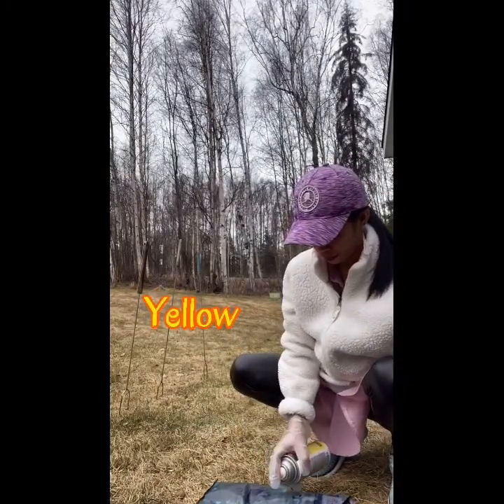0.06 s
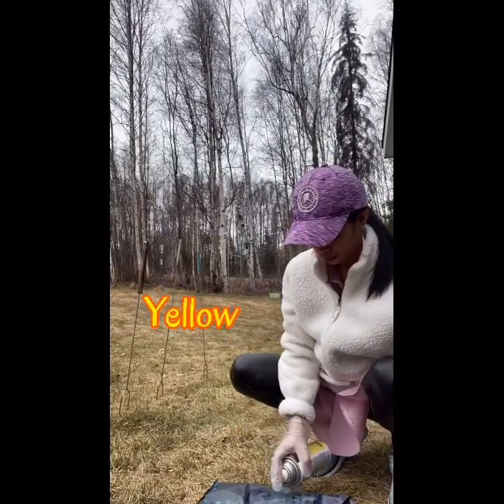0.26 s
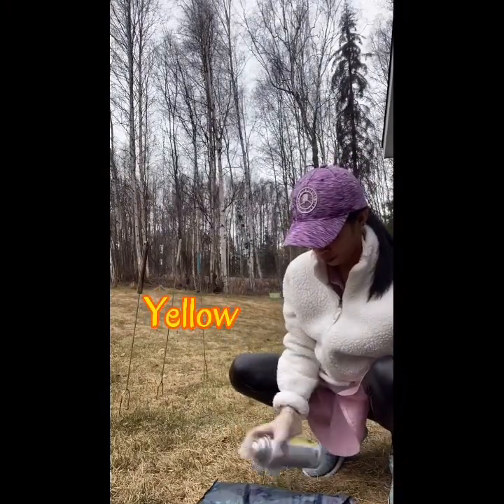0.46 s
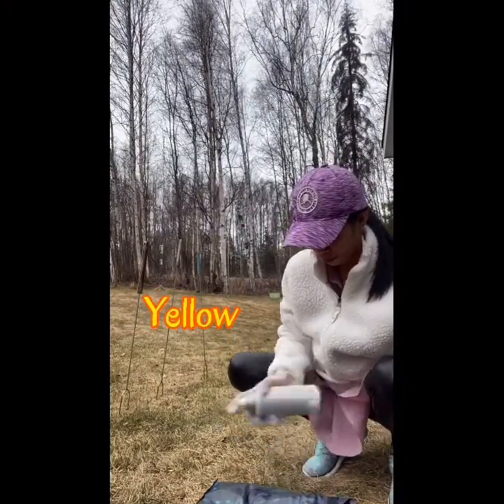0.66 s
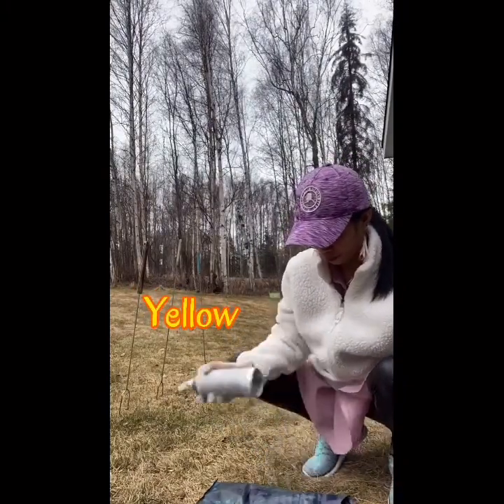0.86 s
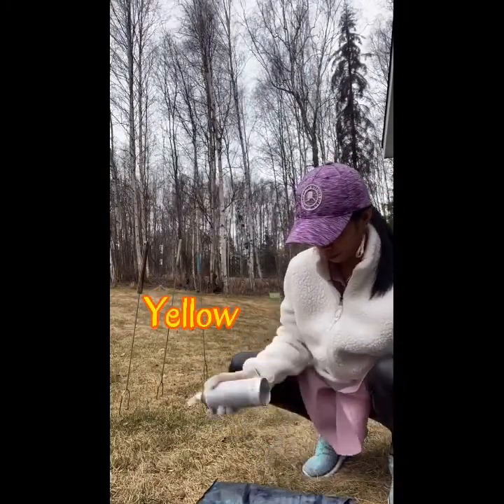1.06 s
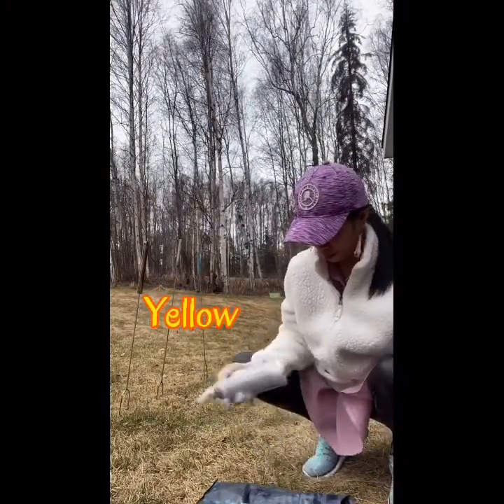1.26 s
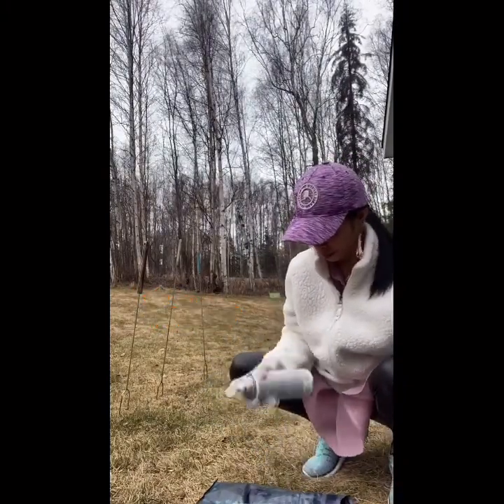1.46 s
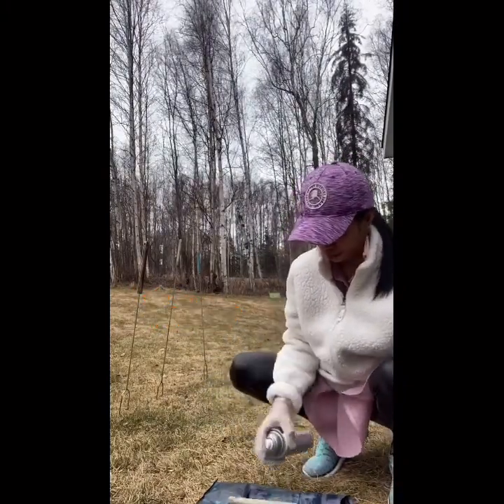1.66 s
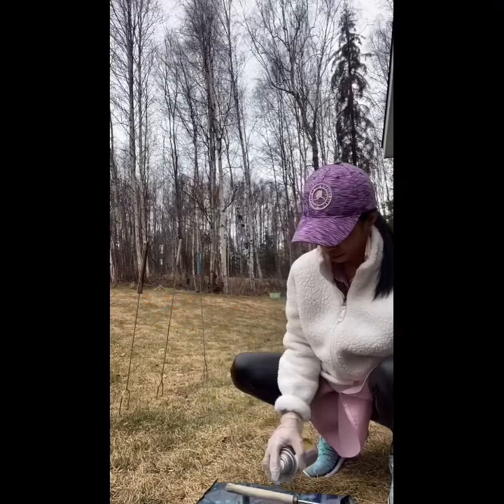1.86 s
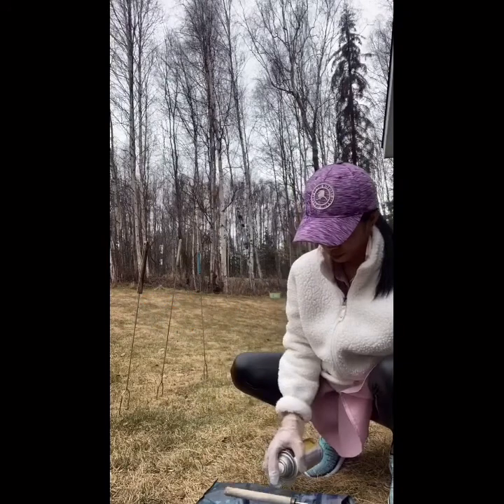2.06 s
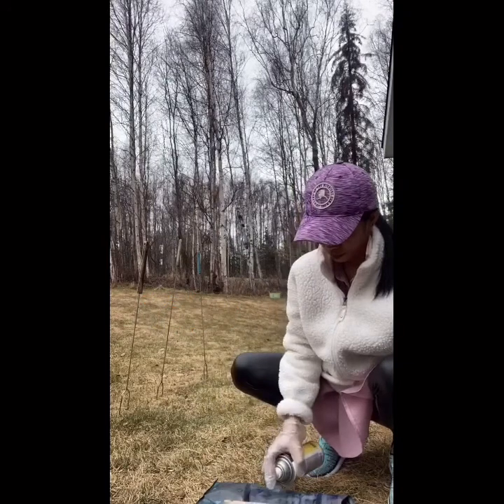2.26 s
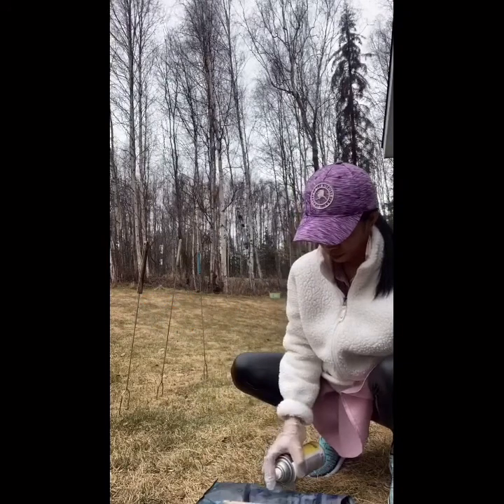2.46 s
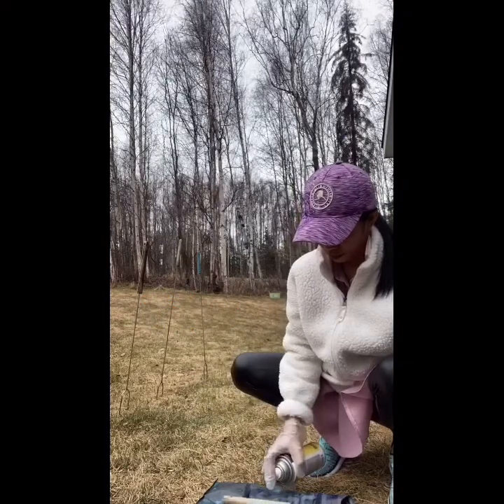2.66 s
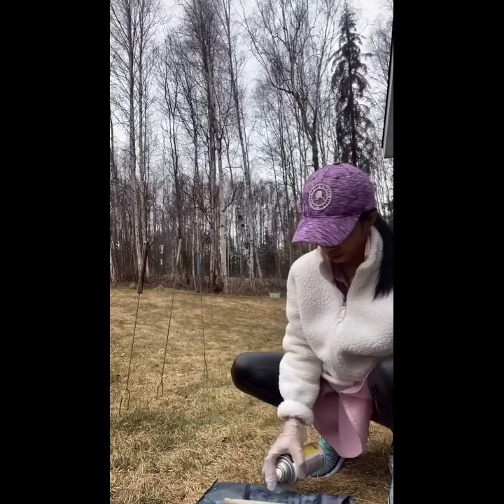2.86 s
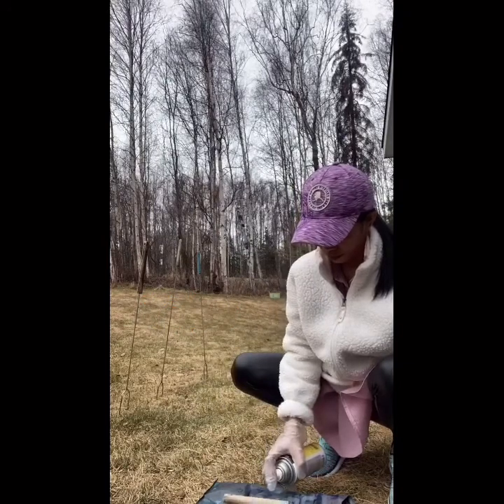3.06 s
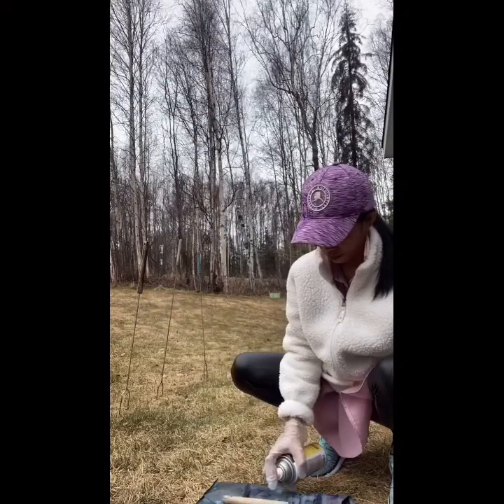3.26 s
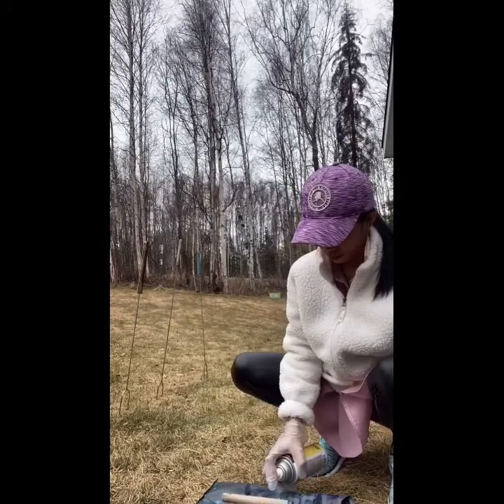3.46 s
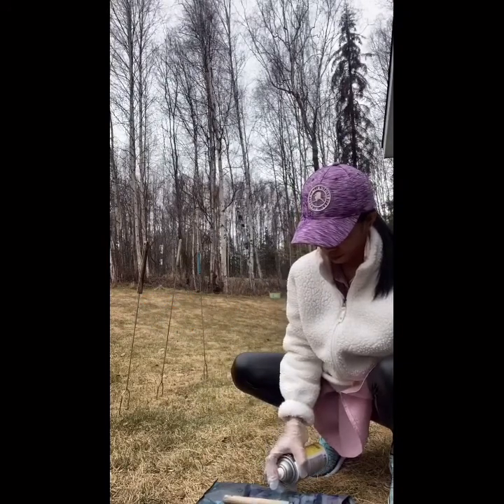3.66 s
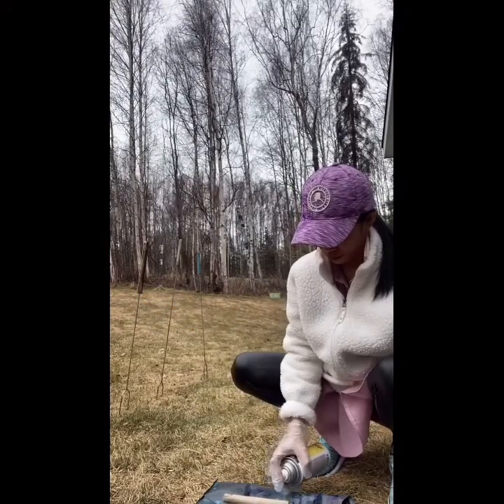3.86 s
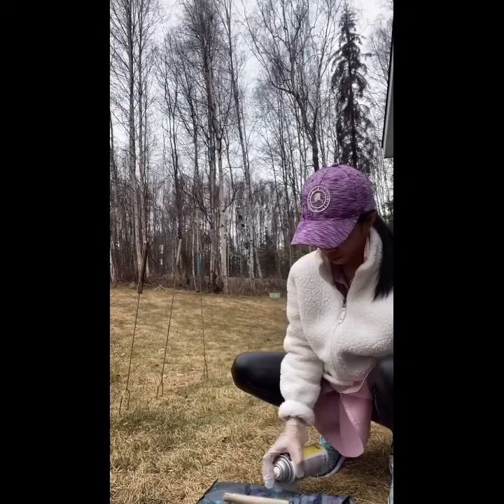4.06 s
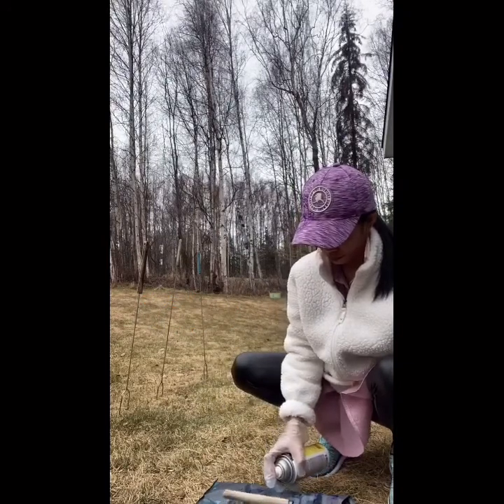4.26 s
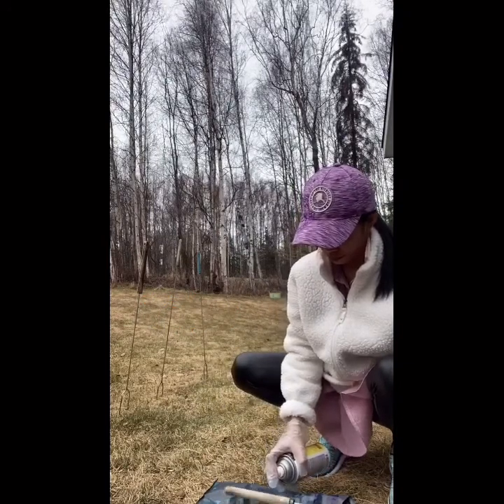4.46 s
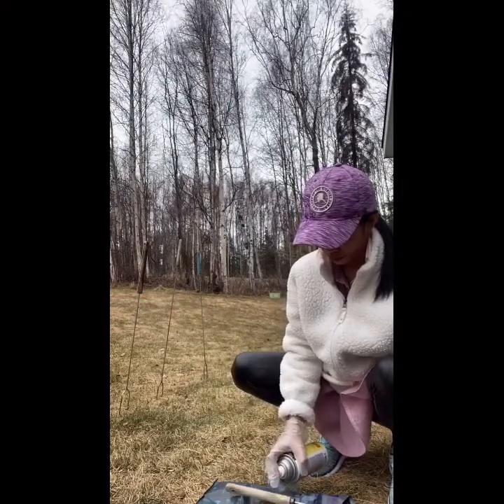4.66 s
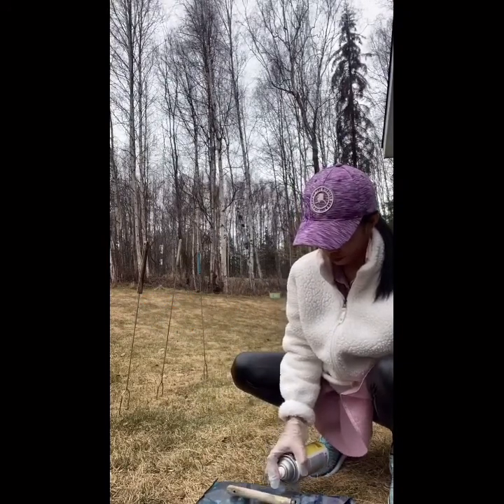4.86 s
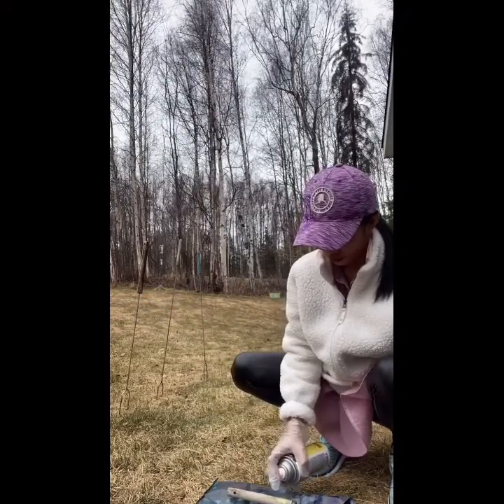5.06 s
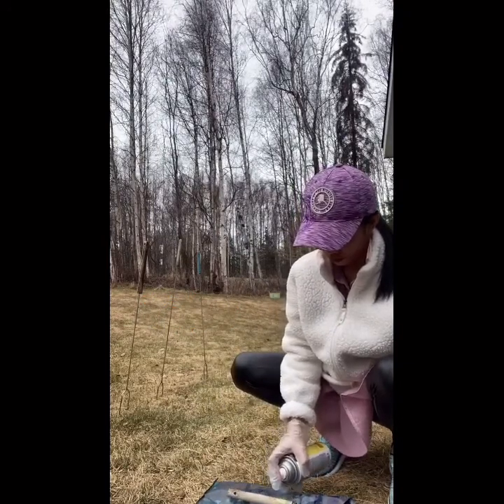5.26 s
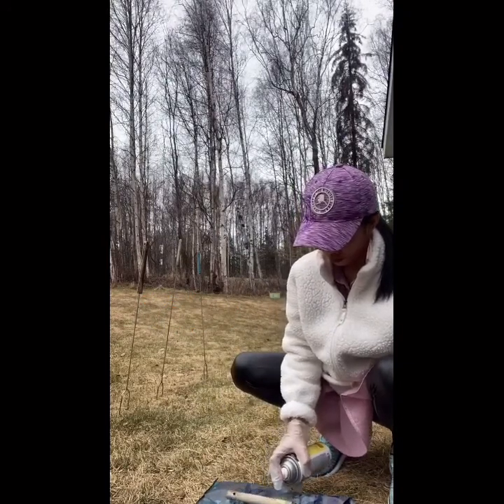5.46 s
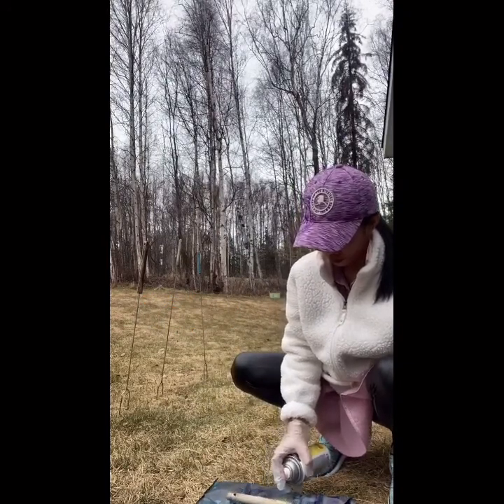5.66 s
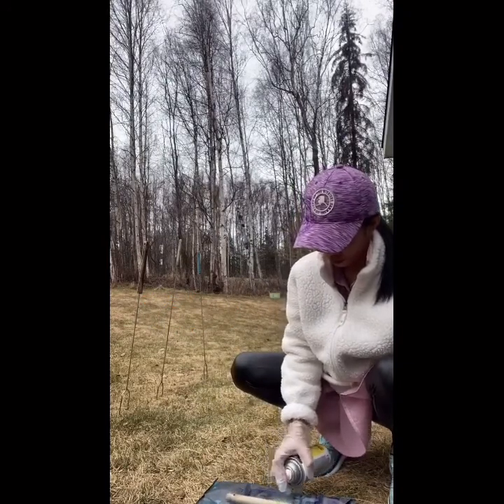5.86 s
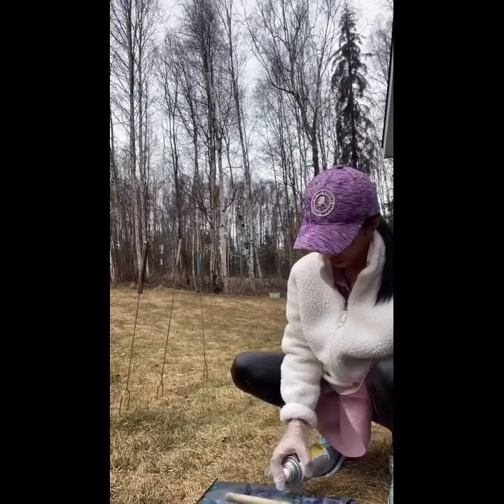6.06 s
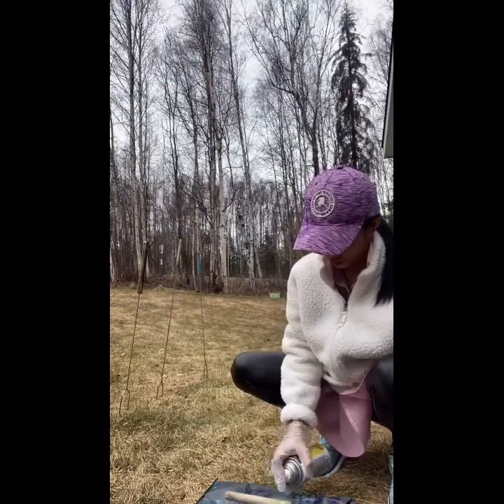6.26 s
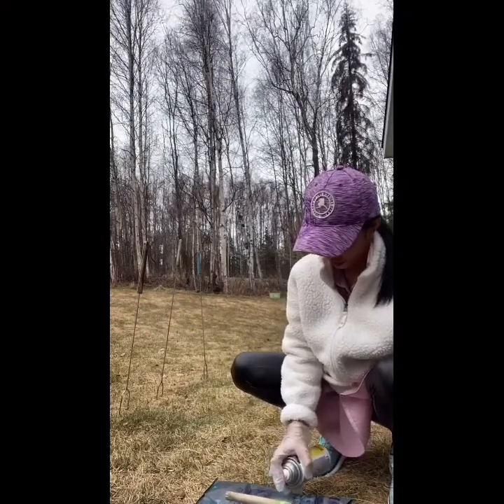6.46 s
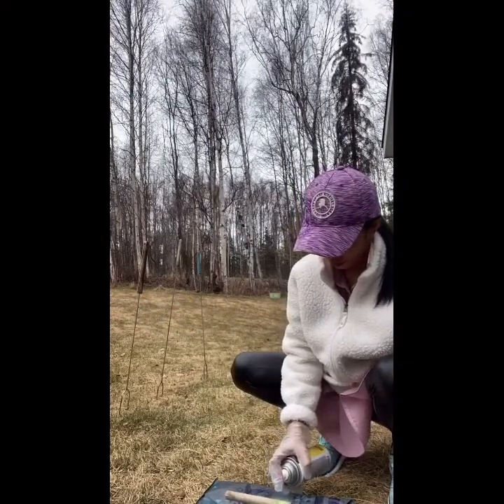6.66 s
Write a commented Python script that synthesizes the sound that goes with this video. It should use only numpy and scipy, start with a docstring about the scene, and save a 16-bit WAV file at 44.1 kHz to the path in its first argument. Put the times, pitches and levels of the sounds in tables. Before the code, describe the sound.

Close to the microphone on open grass, an aerosol paint can is shaken: a dense burst of hard, dry metallic clacks with faint paint slosh and sleeve rustle, thinning to scattered ticks. A quieter gap follows with low wind thumps on the microphone. Then the nozzle opens abruptly into one long, bright hiss that slowly weakens, wavers and spits lightly until the end. Light wind and a faint wash of distant trees lie beneath.

```python
"""A mixing ball clacks in a shaken can of spray paint, then one long hiss is sprayed at a board on the grass.
Damped modes of the can's wall make the knocks; patchy coloured noise makes paint slosh and fleece sleeve.
The spray layers noise for jet, fizz and mist, with short noise bursts where the nozzle spits.
Filtered noise makes light wind and a wash of distant trees that swells with the shaken can;
trains of short waves buffet the two microphone ports, and one tiny sine chip is a far bird."""
import sys
import numpy as np
from scipy import signal
from scipy.fft import rfft, irfft
from scipy.io import wavfile
from scipy.ndimage import uniform_filter1d, map_coordinates

SR = 44100
rng = np.random.default_rng(int(sys.argv[2]) if len(sys.argv) > 2 else 0)


def to_wav(s):
    """Save 16-bit WAV."""
    ch = np.atleast_2d(s).T  # columns
    pcm = np.round(np.clip(ch, -1, 1) * 32767)  # PCM
    wavfile.write(sys.argv[1], SR, pcm.astype(np.int16))


N = 295911
HZ = np.fft.rfftfreq(N, 1 / SR)
TIME = np.arange(N) / SR

# modes of the can's wall, damped by the paint; each knock retunes, weights and stretches them:
# (frequency [Hz], relative level [dB], decay by 60 dB [s])
CAN_MODES = [(1096, 0.5, 0.015), (1576, 0, .013), (1905, -6, 0.014), (2451, -2.5, .012), (3080, -1, 0.015),
             (3650, -0.5, 0.0077), (4076, -4, 0.0083), (5054, -0.5, 0.0057), (5443, -6, 0.0074),
             (6400, -1.5, 0.0083), (7510, 0.5, 0.0053), (8910, -7, 0.0074), (10140, -10, 0.0063),
             (11610, -10.5, 0.00602), (13400, -14.5, .005), (15000, -16, .005)]
# the modes that lead body, ring, clack and tick: index [row of CAN_MODES]
LEADING_MODES = [1, 4, 7, 10]
# strokes of the arm, levels ahead of each layer's trim:
# (middle [s], half length [s], slosh of the paint [dB], swish of the sleeve [dB])
ARM_STROKES = [(0.393, 0.076, -65.5, -66), (0.492, 0.045, -57, -55), (0.577, 0.043, -65, -68.5),
               (0.64, 0.039, -47.5, -58.5), (0.788, 0.073, -47, -51.5), (0.924, 0.047, -52, -57.5),
               (1.083, 0.062, -49.5, -53), (1.248, 0.075, -54.5, -59.5), (1.377, 0.062, -57.5, -67.5),
               (1.46, 0.049, -56, -60.5), (1.58, 0.034, -59, -66.5), (1.696, 0.062, -63.5, -71),
               (2.052, 0.068, -77, -70), (2.222, 0.077, -75.5, -84)]
# left-right likeness of the can's sounds: (frequency [Hz], correlation [-1 to 1])
CAN_LIKENESS = [(600, 0.53), (1500, 0.61), (3000, 0.67), (3700, 0.44), (5000, 0.79), (7000, 0.93),
                (12500, 0.96)]
# left-right likeness of the spray: (frequency [Hz], correlation [-1 to 1])
SPRAY_LIKENESS = [(300, -0.1), (600, 0), (1500, 0.63), (2750, .98), (3100, 0.3), (3250, -1), (3420, -1),
                  (3620, 0.45), (4400, 0.92), (7000, 0.9), (8500, 0.91), (11000, 0.53), (12800, 1)]
# colour of the paint mist: (frequency [Hz], relative density [dB per Hz])
MIST_COLOUR = [(250, -7), (600, 2.5), (1000, -1), (1500, 2), (1950, 2.5), (2150, 2.5), (2400, 9.5),
               (2650, -4.5), (2870, 6), (3300, -21), (3800, 1), (6000, -19), (12000, -41)]
RUSTLE_PATCHY_DB = 3.2  # rms swell of narrow bands in slosh and sleeve


def gain_of(db):
    """Decibels to gain."""
    return 10 ** (np.asarray(db) / 20)


def evened(x):
    """Scales to an rms of 1."""
    return x / np.sqrt(np.mean(x ** 2) + 1e-20)


def read(points, hz):
    """Reads a table along a log-frequency axis."""
    f, value = np.transpose(points)
    return np.interp(np.log(hz + 1), np.log(f + 1), value)


def levels(rows):
    """One gain curve for each dB column of a table in time."""
    s, *columns = np.transpose(rows)
    return [gain_of(np.interp(TIME, s, column)) for column in columns]


def add(mix, s, sound):
    """Mixes a sound in at time s."""
    part = mix[..., max(round(s * SR), 0):][..., :sound.shape[-1]]
    part += sound[..., :part.shape[-1]]


def swell(s, half_s):
    """A smooth rise to 1 at time s, and the fall after it."""
    return np.exp(-((TIME - s) / half_s) ** 2)


def waver(rate_hz, depth_db):
    """A random gain that changes mostly below the given rate; the depth is an rms in dB."""
    slow = irfft(rfft(rng.standard_normal(N)) / (1 + (HZ / rate_hz) ** 4), N)
    return gain_of(depth_db * evened(slow))


def crackle(per_s, size):
    """A gain of 1 with sparse, tiny bursts of uneven strength."""
    strength = np.minimum(rng.exponential(1, N), 3)
    return 1 + size * strength * (rng.random(N) < per_s / SR)


def noise(spectrum, alike, grain=1):
    """Coloured noise at both ports, partly alike; grain clumps it before it is coloured."""
    a, b = rfft(rng.standard_normal((2, N)) * grain)
    same = np.clip(read(alike, HZ), -1, 1)
    pair = np.array([a, same * a + np.sqrt(1 - same ** 2) * b])
    return evened(irfft(pair * gain_of(read(spectrum, HZ)), N))


def patchy(x, depth_db, size):
    """Lets narrow bands swell and fade on their own; size is a patch in (bins, frames)."""
    z = signal.stft(x, nperseg=512, noverlap=384)[2]
    field = uniform_filter1d(rng.standard_normal(z.shape[1:]), size[0], 0)
    field = uniform_filter1d(field, size[1], 1)
    patched = z * gain_of(depth_db * evened(field))
    return evened(signal.istft(patched, nperseg=512, noverlap=384)[1][:, :N])


def ringing(modes, t, stretch=1):
    """Dying sines, one row for each mode; stretch multiplies their pitch."""
    hz, db, t60 = np.transpose(modes)[:, :, None]
    return gain_of(db - 60 * t / t60) * np.sin(2 * np.pi * hz * stretch * t)


def drifting(x, drift_hz=6, share=.007):
    """Plays a hiss at a slightly uneven speed (rms share), so that its peaks and notches wander."""
    drift = evened(irfft(rfft(rng.standard_normal(N)) * HZ / (1 + (HZ / drift_hz) ** 4), N))
    at = np.arange(N) + share * np.cumsum(drift)
    return np.array([map_coordinates(port, [at], order=5, mode="mirror") for port in x])


def air(rumble_db=2.0, wash_db=3):
    """Lumpy wind rumble under a wash of distant trees, swelling near 0.8 s with the can: filtered noise."""
    # open air ahead of the trims: (time [s], wind rumble level [dB], wash level [dB])
    air_levels = [(0, -57.5, -64.5), (.8, -57.5, -58), (1.25, -56.5, -60.5), (2.55, -57.5, -64.5),
                  (2.78, -45.5, -61.5), (3.0, -65.5, -64), (3.45, -69, -64), (4.55, -66.5, -63),
                  (4.8, -50.5, -61.5), (5.15, -63, -64), (5.9, -62, -63), (6.7, -65.5, -66.5)]
    # colour of the wind: (frequency [Hz], relative density [dB per Hz])
    rumble_colour = [(15, -27.5), (30, -15.5), (48, 3), (80, 0.5), (140, -8.5), (220, -9.5), (400, -24.5),
                     (1000, -63)]
    # colour of the wash: (frequency [Hz], relative density [dB per Hz])
    wash_colour = [(60, -18), (200, 2), (330, 1.5), (600, -1), (1000, -8.5), (1600, -13.5), (2500, -17.5),
                   (3300, -28.5), (4300, -29), (6000, -34.5), (10000, -37), (15500, -41.5)]
    # left-right likeness: (frequency [Hz], correlation [-1 to 1])
    air_likeness = [(50, .99), (120, .96), (250, .88), (600, .45), (1200, .55), (8000, .6), (13000, .98)]
    rumble, wash = levels(air_levels)
    low = gain_of(rumble_db) * rumble * noise(rumble_colour, air_likeness) * waver(15.7, 2.9)
    wash_noise = patchy(noise(wash_colour, air_likeness), depth_db=2.5, size=(2, 14))
    return low + gain_of(wash_db) * wash * wash_noise


def bird(s=0.07, level_db=-54.5, hz=2570, half_s=0.0036):
    """One tiny, distant chip: a sine under a short bell-shaped swell."""
    return gain_of(level_db) * swell(s, half_s) * np.sin(2 * np.pi * hz * TIME)


def eddies(count=8, gap_s=0.031, fade_db=-13.5):
    """Each gust sheds a dying train of eddies, uneven in time and pitch: rows of (s, dB, Hz)."""
    # gusts that hit the microphone, levels ahead of the trim in buffets:
    # (time [s], length [s], peak level [dB], pitch of the first eddy [Hz])
    gusts = [(1.208, 0.025, -37.5, 61.6), (1.285, 0.097, -42.5, 76), (1.613, 0.033, -33, 75),
             (2.545, 0.028, -40.5, 62), (2.617, 0.026, -42, 89.7), (2.661, 0.017, -24.5, 90.5),
             (2.68, 0.035, -20.5, 107.2), (2.708, 0.025, -20, 120.5), (2.77, .02, -27, 94),
             (2.791, 0.019, -27.5, 98), (2.815, 0.022, -22, 130.3), (2.835, .05, -24, 99),
             (2.85, 0.019, -28.5, 172), (2.926, 0.02, -37.5, 124), (2.988, 0.024, -45.5, 65.7),
             (3.565, .02, -46, 114.7), (3.61, 0.018, -46, 116), (4.154, 0.13, -46, 77),
             (4.219, 0.043, -36, 111), (4.636, 0.016, -25, 142), (4.668, .02, -38, 75),
             (4.691, .012, -34.5, 284), (4.703, 0.024, -24, 82.5), (4.761, 0.039, -35.5, 119),
             (4.795, 0.029, -36, 124), (4.831, 0.026, -38, 75), (4.911, 0.016, -42, 90),
             (4.958, .02, -45, 140), (5.444, 0.05, -42, 134), (5.729, .02, -45, 93),
             (5.888, 0.034, -43.5, 97), (6.135, 0.018, -47, 81)]
    jitter, pitch_spread = 0.087, .27  # rms share of the gap, rms log ratio
    for s, length_s, db, hz in gusts:
        for k, (late, size) in enumerate(rng.standard_normal((count, 2))):
            uneven = k > 0  # the first eddy keeps its time and pitch
            age = gap_s * (k + jitter * late * uneven)
            yield s + age, db + fade_db * (age / length_s) ** 2, hz * np.exp(pitch_spread * size * uneven)


def buffets(level_db=1, cycles=0.8, swirl_db=-12, swirl_ratio=1.9, shove_db=-11, shove_ratio=0.55):
    """Each eddy pushes the microphone for a cycle or two, with a faster swirl and a slower shove."""
    port_lag = .25  # rms radians by which an eddy reaches one port first
    top_hz = 402  # eddies are too large to push any faster
    out, t = np.zeros((2, N)), np.arange(-SR // 20, SR // 20) / SR

    def wave(f, lag):
        phase = 2 * np.pi * (f * t + rng.random()) + lag
        return np.exp(-(f * t / cycles) ** 2) * np.cos(phase)

    for s, db, hz in eddies():
        lag = port_lag * rng.standard_normal() * np.array([[-.5], [.5]])
        push = wave(hz, lag)
        swirl = gain_of(swirl_db) * wave(hz * swirl_ratio, lag)
        shove = gain_of(shove_db) * wave(hz * shove_ratio, lag)
        add(out, s + t[0], gain_of(db + level_db) * (push + swirl + shove))
    return irfft(rfft(out) / (1 + (HZ / top_hz) ** 10), N)


def sleeve_swish(level_db=1.2):
    """The fibres of the sleeve brush and snag: crackling noise that swells with each stroke."""
    # colour of the fleece: (frequency [Hz], relative density [dB per Hz])
    swish_colour = [(1000, -26), (3000, -5.5), (4500, 1), (5400, -2.5), (6500, -4), (8000, -5), (10000, -8),
                    (12000, -6.5), (15500, -9), (16500, -19.5)]
    strokes = sum(gain_of(db) * swell(s, half_s) for s, half_s, _, db in ARM_STROKES)
    grain = waver(400, 1.4) * crackle(per_s=499, size=2.2)
    fibres = patchy(noise(swish_colour, CAN_LIKENESS, grain), RUSTLE_PATCHY_DB, size=(4, 6))
    return gain_of(level_db) * strokes * fibres


def paint_slosh(level_db=-4):
    """Paint fizzes finely inside the can: crackling noise that swells with each stroke."""
    # colour of the paint: (frequency [Hz], relative density [dB per Hz])
    slosh_colour = [(400, -28), (800, -2.5), (1200, -7.5), (1900, 5), (2450, -0.5), (3150, 2.5), (4000, -8),
                    (6000, -21.5), (12000, -45.5)]
    strokes = sum(gain_of(db) * swell(s, half_s) for s, half_s, db, _ in ARM_STROKES)
    grain = waver(200, 0.89) * crackle(per_s=160, size=3.5)
    paint = patchy(noise(slosh_colour, CAN_LIKENESS, grain), RUSTLE_PATCHY_DB, size=(3, 6))
    return gain_of(level_db) * strokes * paint


def knock(level_db, lasting, lead_hz, family_db, near_db=-13, far_db=-21, far_t60=.11, dull_hz=4500):
    """The ball strikes the wall: a short ring whose modes shift and swell with the spot that is hit."""
    # faint after-ring of the can: (frequency [Hz], relative level [dB], decay by 60 dB [s])
    after_modes = [(1010, -48, 0.2), (1150, -48, 0.27), (1551, -45, .3), (1666, -44, 0.33), (1920, -43, .3),
                   (2462, -46.5, 0.22), (2700, -43, .3), (2958, -40, .25), (3058, -35.5, .25),
                   (3321, -38.5, .25), (4540, -48.5, .2), (7200, -50, .2)]
    # family of each mode, from thud to tick: index [0 to 7]
    family = np.array([0, 1, 1, 2, 3, 4, 4, 5, 5, 6, 7, 7, 7, 7, 7, 7])
    contact_s = .0011  # contact time of ball and wall
    wall_apart = .17  # rms share by which each mode differs at the two ports, in opposite directions
    near_t60 = .02  # [s] the scatter from hand and sleeve dies quickly
    after_db = -22  # share of a blow that feeds the after-ring
    lowest_hz = 800  # the small can radiates little below this
    t = np.arange(SR // 4) / SR
    modes = np.array(CAN_MODES) * [1, 1, lasting]
    stretch = np.ones(len(family_db))
    stretch[1::2] = np.array(lead_hz) / modes[LEADING_MODES, 0]  # body, ring, clack and tick
    wall = gain_of(family_db)[family, None] * ringing(modes, t, stretch[family, None])
    wall = wall * np.minimum(t / contact_s, 1) ** 2
    # the curved wall radiates its modes unevenly to the two ports
    blow = (1 + wall_apart * rng.standard_normal(len(modes)) * np.array([[1], [-1]])) @ wall
    # clothes and ground scatter the blow, duller and differently for each port
    low_pass = signal.butter(2, dull_hz, fs=SR, output="sos")
    dull = signal.sosfilt(low_pass, rng.standard_normal((2, len(t))))
    near, far = gain_of(-60 * t / near_t60), gain_of(-60 * t / far_t60)
    near = gain_of(near_db) * near / np.linalg.norm(near)
    far = gain_of(far_db) * far / np.linalg.norm(far)
    scattered = signal.fftconvolve(blow, dull * (near + far), axes=1)[:, :len(t)]
    after = gain_of(after_db) * np.linalg.norm(wall.sum(0)) * ringing(after_modes, t).sum(0)
    radiated = signal.butter(3, lowest_hz, "highpass", fs=SR, output="sos")
    return gain_of(level_db) * signal.sosfilt(radiated, blow + scattered + after)


def skitter(count=26, ends_db=-3, lasting=0.897, spot_spread=.1, colour_spread_db=5):
    """The loose ball skitters along the wall in light touches, on average strongest in the middle."""
    # mean colour from thud to tick: level of each family [dB]
    family_levels = [-5, -0.5, -3.5, -3, -6, -7.5, -12.5, -9.5]
    start_s, end_s = .56, 1.14
    middle_db, spread_db = -40.5, 3
    out = np.zeros((2, N))
    for k, (late, size, *spot) in enumerate(rng.uniform(-1, 1, (count, 14))):
        along = (k + .5 + .5 * late) / count
        db = middle_db + spread_db * size + ends_db * (2 * along - 1) ** 2
        lead_hz = np.array(CAN_MODES)[LEADING_MODES, 0] * (1 + spot_spread * np.array(spot[:4]))
        family_db = family_levels + colour_spread_db * np.array(spot[4:])
        add(out, np.interp(along, [0, 1], [start_s, end_s]), knock(db, lasting, lead_hz, family_db))
    return out


def rattle():
    """The clear knocks of the ball; the spot that is hit damps, tunes and weights families of modes."""
    # (time [s], level [dB], ring time [factor], body, ring, clack, tick [Hz each],
    #  relative level of thud, body, bell, ring, edge, clack, ping, tick [dB each])
    ball_knocks = [(0.155, -51.5, 1.27, 1780.0, 3270.0, 4870.0, 6700, -5, -6.0, -3, -22.0, -2, 1, -20.0, -12.0),
                   (0.292, -33.5, 0.64, 1740.0, 3370.0, 5420.0, 8400, -25, -23, -12, -1.5, -6.0, -6.0, -12.0, -7),
                   (0.4561, -19.5, 0.68, 1400.0, 3240.0, 5490.0, 8400, -27.0, -23, -34.0, -19, -12.0, 3, -10, -15),
                   (0.521, -37, 1.17, 1860, 3080.0, 5390.0, 6300, -12.0, -0.5, -4.0, -11.0, -3, -8.0, -6, -9),
                   (0.568, -45, 1.5, 1570, 2940.0, 4950.0, 7230.0, -16.0, 0.0, -8.0, 1, -11.0, -4.0, -19.0, -8.0),
                   (0.595, -5.5, 1.29, 1870, 3120.0, 5340.0, 7900, -18.5, -15.5, -10.5, -7.5, -8.5, -0.5, -7.5, -8.0),
                   (0.629, -36.0, 1.1, 1710, 3120.0, 5020.0, 7920.0, -18, -16, 1, 0.0, -1, -1.0, -13.0, -5),
                   (0.6496, -16, 0.78, 1720, 3380.0, 5040.0, 7900, -10.5, -3.5, -7.0, -10.5, -5.0, -1, -12, -1),
                   (0.674, -33, 0.54, 1370, 3350.0, 4980.0, 7490.0, -1, -2.0, -13, -7.0, -12.0, -8, -15.0, -12),
                   (0.6938, -5, 0.78, 1580, 3210.0, 5120.0, 7600, -18.5, -11.5, -22, -11.5, -6.5, -17, -14, -2),
                   (0.7139, -13, 0.64, 1850.0, 2750.0, 4830.0, 7700, -32.0, -1.5, -8.0, -10, -8.0, -12, -11, -4),
                   (0.7394, -18, 1.23, 1560.0, 2860.0, 5020.0, 7500, -12, -8.0, -17, -13, -13, -1, -18.0, -2.0),
                   (0.751, -23, 0.69, 1780, 2800.0, 4640.0, 7900, -8, -2.0, -12.0, -22, -26.0, 0.0, -16.0, -10),
                   (0.7715, 5.0, 0.84, 1770, 3010.0, 4900.0, 7550.0, -24, -14.5, -22.0, -8.5, -14, 0.5, -8.5, -5.5),
                   (0.804, -4, 0.55, 1790, 2750.0, 4670.0, 7400, -21, -8.5, -22.0, -16, -10.0, -2, -18.0, -3.5),
                   (0.843, -16, 0.56, 1710.0, 2890.0, 5350.0, 8700, -13, -3.5, -2, -3, -4.0, 0, -10, -1),
                   (0.852, -34, 0.89, 1840.0, 3330.0, 5560.0, 8090.0, -21, -14, -15, -2.0, 0.0, -13, -12.0, -11.0),
                   (0.861, -12, 0.47, 1520, 3210.0, 4790.0, 8400, -9, -4.0, -13, -8.0, -8.0, -5, -11, -1),
                   (0.881, -48, 0.67, 1680.0, 3060.0, 4960.0, 8300.0, -12.0, -7, -4.0, -4.0, -8.0, 0.0, -9.0, -5),
                   (0.907, -7, 0.88, 1590, 3430.0, 5550.0, 8300, -17, -17, -11, -11, -1, -6.5, -11.5, -2.5),
                   (0.9738, -5, 0.4, 1540, 3280.0, 5130.0, 8200, -9, -4.5, -18.0, -19, -10, -6, -2.5, -1),
                   (1.0109, -13, 1.32, 1830, 2920.0, 4470.0, 7600, -27, -8, -19, -18.0, -18, -1.5, -23.0, -12),
                   (1.021, 0.5, 0.85, 1480, 3140.0, 5330.0, 7700, -26.0, -18, -12, -9.5, -7.5, 2, -4, -3),
                   (1.031, -34, 0.68, 1440.0, 3060.0, 4970.0, 7470.0, -16, -24, -18, -11, -6, -6.0, -10, 2),
                   (1.069, -19.5, 0.78, 1770, 2800.0, 4780.0, 7800, -10.5, -1.5, -3.5, -16.0, -14, -4, -11.0, -5),
                   (1.088, -26.5, 0.95, 1850.0, 3200.0, 5030.0, 7590.0, -18.0, 0.5, -10.0, -13.0, -2, -10.0, -16.0, -16),
                   (1.097, -31, 0.61, 1850.0, 3300.0, 4680.0, 7660.0, -12.0, 4, -10.0, -10.0, -3.0, -2.0, -10.0, -9.0),
                   (1.133, -38.5, 1.21, 1850.0, 3050.0, 5600.0, 6500, -13.0, -2.0, -16.0, 1, -6.0, -13.0, -10.0, -1.0),
                   (1.1423, -30.5, 0.9, 1490, 2910.0, 5410.0, 8200, -9, -0.5, -6.0, -10, -7.0, -10.0, -12.0, -6.0),
                   (1.261, -21.5, 0.65, 1820, 2780.0, 5530.0, 7900, -15, -14.0, -5, -18.0, -8, 1, -13.0, -3),
                   (1.2676, -21.5, 0.42, 1470.0, 2960.0, 4970.0, 9500, -14.0, -5.5, -8.0, -9, -5, -1, -8.0, -4.0),
                   (1.277, -26, 0.55, 1500, 3350.0, 5170.0, 7040.0, -8, -6, -22.0, -4, -3, -12.0, -14, -12),
                   (1.316, -29.5, 0.78, 1360.0, 3260.0, 4870.0, 8500, -12, -16.0, -18.0, -0.5, -4, -4, -4, -5),
                   (1.326, -27.0, 0.71, 1810.0, 2750.0, 5020.0, 7940.0, -8.5, -1, -8.0, -18.0, -11.0, -18.0, -19.0, -16.0),
                   (1.4549, -22.5, 0.4, 1450.0, 3100.0, 5590.0, 8200, -13.0, -11, -9.0, -10, -7, 3, -17.0, -5),
                   (1.461, -27, 0.56, 1430.0, 3200.0, 5490.0, 8200, -10.0, -4.0, -12, -14.0, -3.0, -2.0, -4.0, -3),
                   (1.5175, -37.5, 1.1, 1440.0, 3320.0, 5300.0, 7730.0, -20, -18, -8, -11, -3.0, 1, -13.0, -10.0),
                   (1.5481, -10.5, 0.72, 1750, 3300.0, 5250.0, 9200, -22.5, -14.5, -11.5, -10, -0.5, -5.5, -16, -9),
                   (1.6398, -27, 1.12, 1390, 3390.0, 4920.0, 6500, -8, -0.5, -6, -21, -14, -12.0, -14, -3),
                   (1.6686, -30, 0.67, 1790, 3210.0, 4870.0, 7000.0, -9.0, -5.0, -10, -19.0, -6.0, -3, -12.0, -1),
                   (1.6829, -39, 0.8, 1840.0, 3320.0, 4820.0, 7150.0, -5.0, -1.0, -14.0, -14.0, -2.0, -2.0, -15.0, -1),
                   (1.707, -29.5, 0.41, 1780.0, 3060.0, 5280.0, 9400, -10, -7, -7, -9.5, -3, -2, -13, -5),
                   (1.723, -34.5, 0.69, 1770, 3260.0, 5000.0, 8700, -6.0, -0.5, -9.5, -17, -4.0, -3.5, -27.0, -10),
                   (1.7355, -45.0, 1, 1836, 3150.0, 4810.0, 7500, -4.0, -3.5, -5.5, -16.5, -20, 3, -24.0, -4.0),
                   (1.995, -35.5, 0.62, 1760.0, 3230.0, 4860.0, 8500, -11, -9, -4, -12.5, -0.5, -4.0, -14, -10)]
    out = np.zeros((2, N))
    for s, db, lasting, *spot in ball_knocks:
        add(out, s, knock(db, lasting, lead_hz=spot[:4], family_db=spot[4:]))
    return out


def spits(level_db=-1, rise_s=0.00052, octaves=0.83):
    """Blobs of paint burst from the nozzle: short surges of the mist, each in its own band."""
    # levels ahead of the trim: (time [s], level [dB], band centre [Hz], decay by 60 dB [s])
    blobs = [(5.447, -43, 2230, 0.014), (5.791, -38.5, 2400, 0.01), (6.207, -38, 3070, 0.016),
             (6.353, -48, 1200, 0.022), (6.555, -42.5, 3020, 0.02)]
    out, t = np.zeros((2, N)), np.arange(SR // 10) / SR
    mist = noise(MIST_COLOUR, SPRAY_LIKENESS)
    for s, db, hz, t60 in blobs:
        edges = np.minimum(hz * 2 ** (octaves * np.array([-.5, .5])), SR / 2 - 1)
        band = signal.butter(1, edges, "bandpass", fs=SR, output="sos")
        burst = evened(signal.sosfilt(band, mist[:, round(s * SR):][:, :len(t)]))
        add(out, s, gain_of(db - 60 * t / t60) * np.minimum(t / rise_s, 1) * burst)
    return gain_of(level_db) * out


def flow(opens_s=3.25, mist_follows=0.5):
    """Gains of jet, fizz and mist: they sag as the can cools, and swell and ebb as the nozzle swings."""
    # (middle [s], half length [s], change in rush of the jet [dB], change in fizz of the nozzle [dB])
    nozzle_swings = [(3.337, 0.08, 4, 5), (3.753, 0.16, 1.5, 2.5), (4.512, 0.41, 0, -4.5),
                     (4.947, 0.06, 0, 3), (5.33, 0.062, 2.5, -1.5), (5.632, 0.095, 0.5, 3),
                     (6.202, 0.11, 8.5, 4), (6.586, 0.14, 7.5, 5)]
    jet_db = sum(db * swell(s, half_s) for s, half_s, db, _ in nozzle_swings)
    fizz_db = sum(db * swell(s, half_s) for s, half_s, _, db in nozzle_swings)
    age = TIME - opens_s
    # level at the opening [dB], sag [dB per s], swing; the mist takes a share of the jet's swing
    jet = gain_of(-46.9 - 3.5 * age + jet_db)
    fizz = gain_of(-48 - 2.16 * age + fizz_db)
    mist = gain_of(-57.5 - 1.35 * age + mist_follows * jet_db)
    return jet, fizz, mist


def spray():
    """The valve leaks, then opens on a turbulent jet that sputters slightly; its mist strikes the board."""
    # (time [s], share of the full flow [0 to 1])
    valve_opening = [(3.205, 0), (3.222, .1), (3.236, .16), (3.241, .75), (3.26, 1)]
    # colour of the rushing jet: (frequency [Hz], relative density [dB per Hz])
    jet_colour = [(2000, -32), (3400, -7.5), (3750, -14), (4400, -1.5), (5300, -0.5), (5700, -2.5),
                  (6150, 2), (6700, -6), (7300, -2.5), (9000, -4), (14000, -45)]
    # colour of the nozzle's fizz: (frequency [Hz], relative density [dB per Hz])
    fizz_colour = [(5000, -30), (7000, -18), (7800, -1), (8700, 3.5), (9500, 2.5), (10300, 4), (11300, 1),
                   (12800, 4), (14000, 2.5), (15600, -1), (16000, -42)]
    jet, fizz, mist = flow()
    jet_noise = noise(jet_colour, SPRAY_LIKENESS, waver(900, 0.56))
    fizz_noise = noise(fizz_colour, SPRAY_LIKENESS, waver(900, 0.68))
    mist_noise = noise(MIST_COLOUR, SPRAY_LIKENESS, waver(440, 0.54))
    rush = jet * patchy(jet_noise, depth_db=1.9, size=(4, 16))
    top = fizz * patchy(fizz_noise, depth_db=2.5, size=(6, 16))
    patter = mist * patchy(mist_noise, depth_db=2.5, size=(3, 12))
    sputter = waver(60, 0.39)
    valve = np.interp(TIME, *np.transpose(valve_opening))
    return valve * drifting((rush + top) * sputter + patter)


def scene():
    """Open air, shaken can and spray together."""
    outdoors = air() + bird() + buffets()
    shaking = sleeve_swish() + paint_slosh() + skitter() + rattle()
    return outdoors + shaking + spits() + spray()


def record(dry):
    """The two ports differ in phase and level; then a low-pass limits the band."""
    # (frequency [Hz], phase by which the left leads [radians])
    port_phase = [(60, 0), (400, -.15), (1000, -.15), (1700, -.95), (2300, -1.15), (2900, -.75), (3220, 0),
                  (3450, 0), (4300, -.1), (6500, -.15), (8000, -.78), (10500, -1.75), (11300, -2.45),
                  (13000, -3.14)]
    # (frequency [Hz], left over right [dB])
    port_balance = [(100, 0.5), (800, 0.6), (1400, 1.8), (2500, 0), (3200, 0), (3450, 0), (3800, 2.5),
                    (5500, 5.5), (6600, 0.2), (11000, 0)]
    edge_hz = 16500
    half = np.exp(.5j * read(port_phase, HZ)) * gain_of(read(port_balance, HZ) / 2)
    pair = irfft(rfft(dry) * np.array([half, 1 / half]), N)
    low_pass = signal.firwin(511, edge_hz, window=("kaiser", 9), fs=SR)
    return signal.oaconvolve(pair, low_pass[None], "same")


dry = scene()
out = record(dry)
to_wav(out)
```